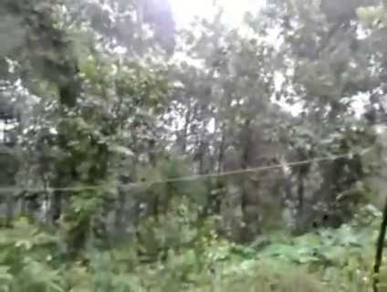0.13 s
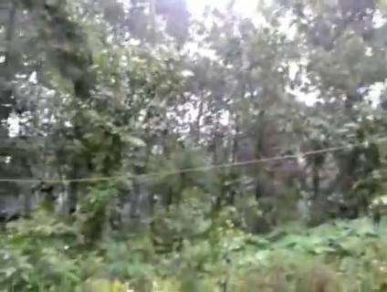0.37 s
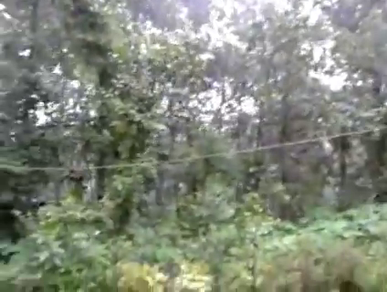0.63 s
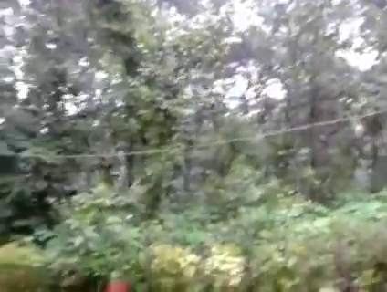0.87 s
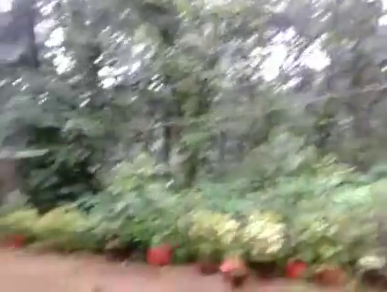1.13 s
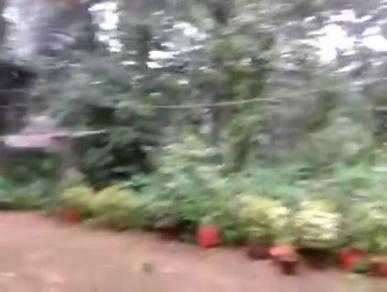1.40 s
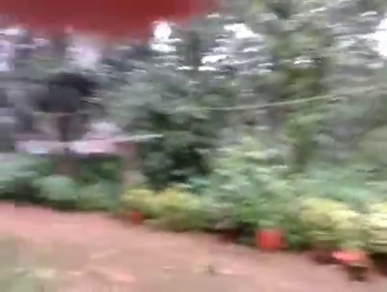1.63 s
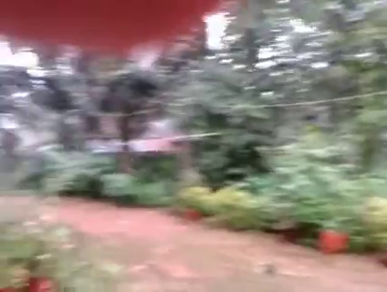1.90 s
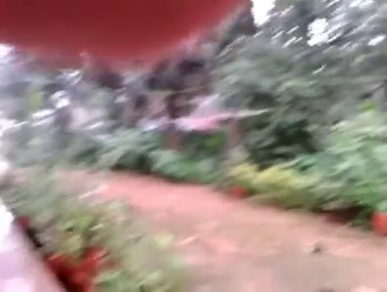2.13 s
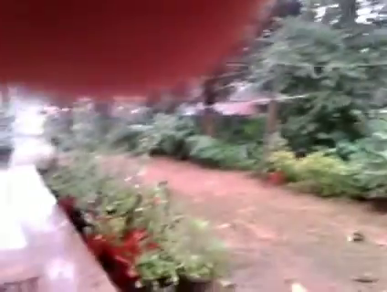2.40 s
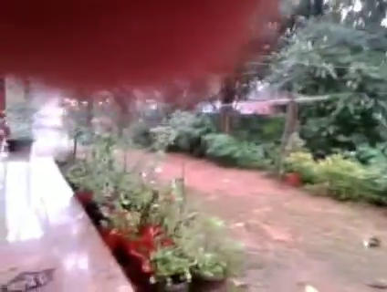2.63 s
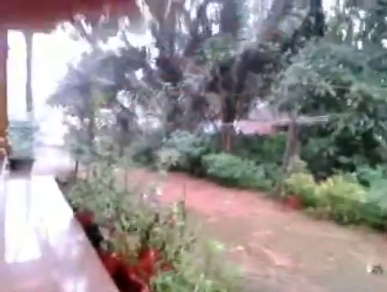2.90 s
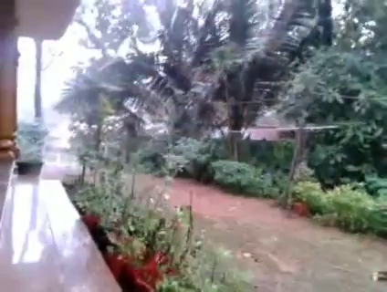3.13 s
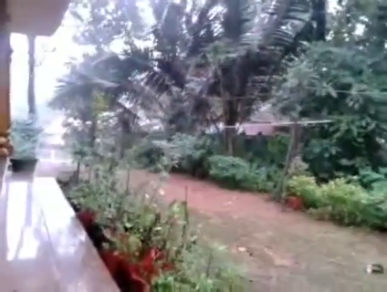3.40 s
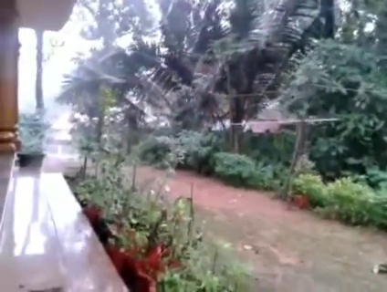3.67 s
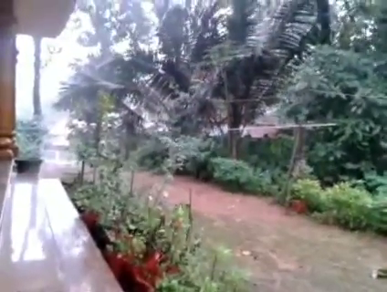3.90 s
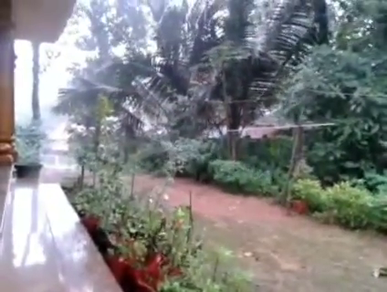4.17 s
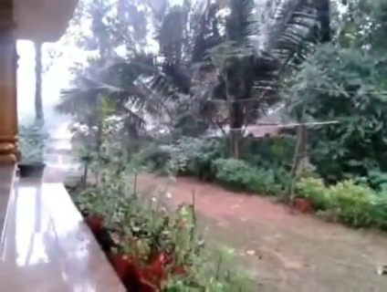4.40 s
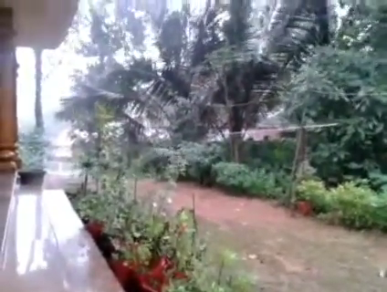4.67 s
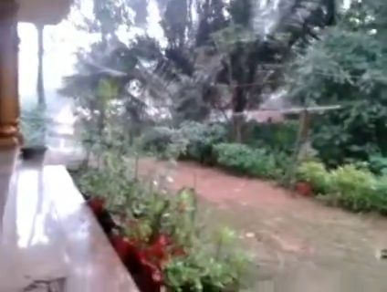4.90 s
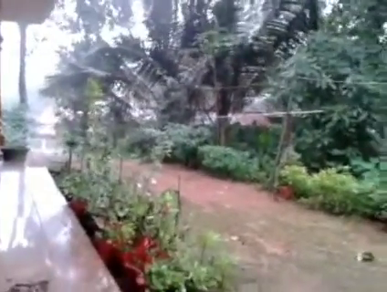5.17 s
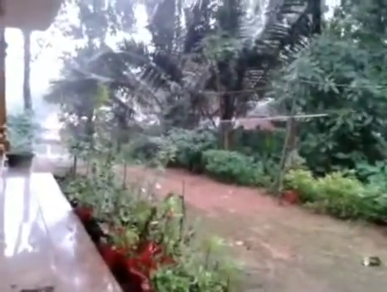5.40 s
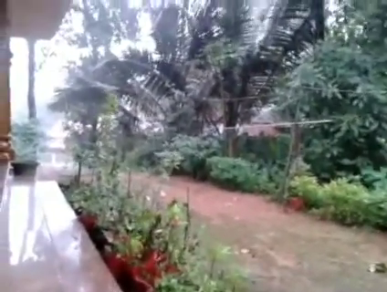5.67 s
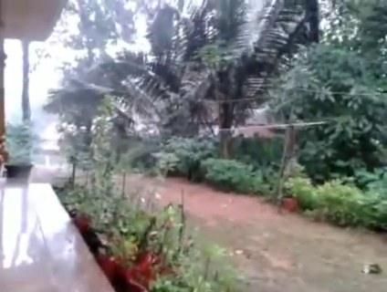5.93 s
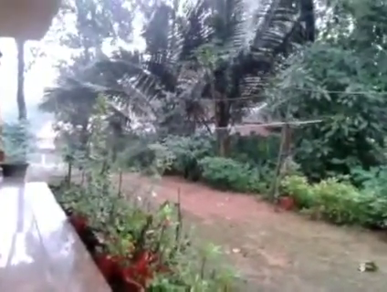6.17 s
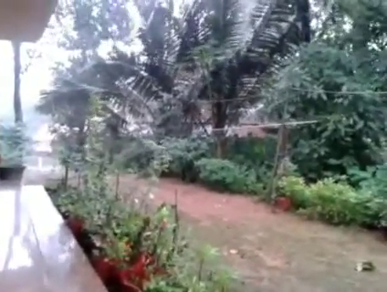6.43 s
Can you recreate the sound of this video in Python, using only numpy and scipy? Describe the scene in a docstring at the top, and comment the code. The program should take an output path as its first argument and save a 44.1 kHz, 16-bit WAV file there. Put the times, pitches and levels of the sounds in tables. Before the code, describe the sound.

Heavy rain is already falling at 0 s and continues without a break to about 6.5 s: a dense, smooth hiss from countless drops on trees, leaves and wet ground, strongest in the middle range, with little deep bass and no very high treble. Very many tiny ticks of nearer drops on leaves give it a fine grain. The level stays nearly constant, slightly brighter around 1.75 s, then sinks gently by a few decibels after 5 s. Beneath it, faint low wind flutters against the microphone in short gusts, notably near 2.4, 3.4, 4.7 and 5.8-6.3 s. Soft dull bumps on the case occur near 0.2 s, clearest at 2.5 s, then clustered around 4.7-4.95 s and 5.8-6.35 s. The listener is on a porch beside an open garden; the small mono microphone sounds close, plain and slightly band-limited. The rain is still falling at the end.

```python
"""A smooth hiss of heavy rain on trees, leaves and wet ground, heard from a porch by a small mono microphone.
Random spectra make the hiss of countless far drops; damped sine ticks make the nearer drops on leaves.
Low noise that swells in gusts makes the wind on the microphone, and short pulses are bumps on its case.
The recorder samples at 16 kHz, so the hiss stops near 7 kHz and leaves a faint mirror above 8 kHz."""
import sys
import numpy as np
from scipy import signal
from scipy.fft import rfft, irfft, next_fast_len
from scipy.io import wavfile
from scipy.ndimage import uniform_filter1d

SR = 44100
rng = np.random.default_rng(int(sys.argv[2]) if len(sys.argv) > 2 else 0)


def invert_db(level):
    """Linear amplitude ratio for a level in decibels (20 dB per decade), elementwise."""
    return 10 ** (np.asarray(level, dtype=float) / 20)


def pcm_store(signal):
    """Save signal as 16-bit PCM."""
    levels = np.round(np.clip(np.atleast_2d(signal), -1, 1) * 32767)
    wavfile.write(sys.argv[1], SR, levels.astype(np.int16).T)


N = 288855  # length in samples

# Slow course of the shower: (t/s, rain level/dB, treble lift/dB)
RAIN_COURSE = [(0, -22.5, -1.5), (1.0, -23, -0.1), (1.3, -21.8, -0.9), (1.75, -22.5, 1), (2.5, -23, -0.5),
               (2.85, -22.5, -1), (3.6, -23.5, 0.1), (4.4, -23.5, -0.8), (5.2, -24, 0), (5.7, -25, -0.2),
               (6.55, -25.5, -0.4)]
# Rain as the microphone colours it: (f/Hz, relative level/dB)
RAIN_SPECTRUM = [(60, -55.5), (105, -42.5), (160, -27.5), (250, -18), (330, -12), (430, -6), (650, -1.5),
                 (1000, -0.26), (1500, -0.76), (2200, -2), (3000, -4.5), (4500, -7.5), (6700, -8)]
# Drops close enough to tick alone: rate, and level relative to the far drops before colouring
NEAR_DROPS_PER_S, NEAR_DROPS_DB = 1400, -13

# Short low thuds as gusts or fingers bump the case: (t of the peak/s, peak level/dB)
CASE_BUMPS = [(0.213, -39), (1.58, -45), (2.502, -34.5), (3.398, -44), (4.721, -40), (4.872, -36),
              (4.945, -40), (5.821, -41), (5.913, -45), (6.129, -44), (6.247, -36), (6.334, -36)]
CASE_HZ = 176

# Breeze on the microphone between gusts: (t/s, level/dB)
BREEZE_COURSE = [(0, -61), (0.9, -57.5), (1.6, -59), (2.3, -63), (2.6, -52), (3.2, -61), (4.5, -62),
                 (4.75, -57), (5.2, -57), (5.65, -62), (6.05, -55), (6.55, -53)]
# Gusts that buffet the microphone: (t of full strength/s, hold/s, level/dB)
WIND_GUSTS = [(0.284, 0.038, -50), (0.618, 0.036, -51), (0.893, 0.074, -53), (1.186, 0.034, -51),
              (1.41, 0.084, -52), (2.404, 0.19, -48.5), (2.75, 0.036, -52), (3.359, 0.05, -47),
              (3.46, 0.039, -50), (4.65, 0.032, -52), (4.708, 0.086, -47), (4.842, 0.081, -47),
              (5.004, 0.036, -53), (5.085, 0.054, -53), (5.227, 0.048, -50), (5.793, 0.13, -45.5),
              (5.983, 0.03, -49), (6.07, 0.17, -46), (6.337, 0.15, -51)]
GUST_RISE_S, GUST_FALL_DB_PER_S = 0.016, 299
# Turbulence at the microphone port: (f/Hz, relative level/dB)
TURBULENCE_SPECTRUM = [(8, -13.5), (20, 0.3), (40, -2), (60, -9.5), (85, -14), (105, -35), (130, -18),
                       (200, -25.5), (300, -35), (600, -73.5)]

# Anti-alias slope before sampling: (f/Hz, gain/dB)
ANTI_ALIAS = [(6850, 0.51), (7100, -6), (7500, -25), (7700, -28), (7850, -32), (8000, -43), (8030, -96.5)]
# What passes of the mirror image when raising the sample rate: (f/Hz, gain/dB)
IMAGE_FILTER = [(7970, -67.5), (8000, 1), (8300, -7.5), (8800, -26.5), (9000, -37.5), (9200, -51.5),
                (9400, -90.5)]
SAMPLING_HZ = 16000
CONVERTER_OFFSET = 0.0016  # of full scale


def rain():
    """Superposition: far and near drops add, then share the colour and slow level of the shower."""
    s, level_db, _ = np.transpose(RAIN_COURSE)
    far = evened(far_drops())
    drops = far + invert_db(NEAR_DROPS_DB) * near_drops()
    upper_end = [(7600, -5.5), (9000, -79.5)]  # (f/Hz, relative level/dB)
    drops = evened(coloured(drops, RAIN_SPECTRUM + upper_end))
    return drops * invert_db(np.interp(np.arange(N) / SR, s, level_db))


def far_drops(patchy_db=0.42, flicker_db=-0.38):
    """Central limit: countless impacts sum to Gaussian noise, here with slight fluctuations of level."""
    frames, hz = N // 128 + 5, np.fft.rfftfreq(512, 1 / SR)
    real, imaginary, patches, flicker = rng.standard_normal((frames, 257, 4)).T
    # patches are narrow in frequency and longer in time; flicker is broad and brief
    patches = uniform_filter1d(patches, size=6, axis=0)
    patches = evened(uniform_filter1d(patches, size=24, axis=1))
    flicker = uniform_filter1d(flicker, size=40, axis=0)
    flicker = evened(uniform_filter1d(flicker, size=3, axis=1))
    # fine drops brighten the hiss: the lift grows from 1200 Hz and is full two octaves above
    s, _, treble_db = np.transpose(RAIN_COURSE)
    lift_db = np.interp(np.arange(frames) * 128 / SR, s, treble_db)
    share = np.clip(np.log2(hz[:, None] / 1200 + 1e-9) / 2, 0, 1)
    level_db = patchy_db * patches + flicker_db * flicker + lift_db * share
    spectra = (real + 1j * imaginary) * invert_db(level_db)
    return signal.istft(spectra, nperseg=512, noverlap=384)[1][:N]


def near_drops(spread_db=3.0, cycles=2.0, pitches=24):
    """Damped free vibration: random impacts ring leaves of random pitch, decaying within a few cycles."""
    # most drops are small, a few are large
    strength = invert_db(spread_db * np.minimum(rng.exponential(1, N), 2.2))
    impacts = strength * (rng.random(N) < NEAR_DROPS_PER_S / SR)
    leaf = rng.integers(0, pitches, N)
    t, out = np.arange(600) / SR, np.zeros(N)
    for k, hz in enumerate(np.geomspace(400, 7000, pitches)):
        tick = np.exp(-t * hz * np.pi / cycles) * np.sin(2 * np.pi * hz * t)
        tick = tick / np.linalg.norm(tick) * np.sqrt(hz)  # energy grows with pitch
        out += signal.oaconvolve(impacts * (leaf == k), tick)[:N]
    return evened(out)


def thuds(cycles=0.43):
    """Impulse response of the case: each bump is a soft push, about two swings under a Gaussian bell."""
    t, out = np.arange(N) / SR, np.zeros(N)
    for s, db in CASE_BUMPS:
        near = slice(round(s * SR) - 1500, round(s * SR) + 1500)
        turns = (t[near] - s) * CASE_HZ
        bell = np.exp(-0.5 * (turns / cycles) ** 2)
        out[near] -= invert_db(db) * bell * np.cos(2 * np.pi * turns)
    return out


def wind(lumpy_db=3.0):
    """Turbulent pressure: low noise whose power sums a lumpy breeze and gusts that rise, hold and fall."""
    s, level_db = np.transpose(BREEZE_COURSE)
    t = np.arange(N) / SR
    lumps = uniform_filter1d(rng.standard_normal(N), size=2000)
    lumps = evened(uniform_filter1d(lumps, size=2000))
    power = invert_db(np.interp(t, s, level_db) + lumpy_db * lumps) ** 2
    for full, hold, db in WIND_GUSTS:
        rise = np.clip((t - full) / GUST_RISE_S + 1, 0, 1)
        fall_db = GUST_FALL_DB_PER_S * np.maximum(t - full - hold, 0)
        power += (rise * invert_db(db - fall_db)) ** 2
    turbulence = evened(coloured(rng.standard_normal(N), TURBULENCE_SPECTRUM))
    return turbulence * np.sqrt(power)


def evened(x):
    """Normalisation: scales x to an rms of 1."""
    return x / np.sqrt(np.mean(x ** 2) + 1e-20)


def coloured(x, points):
    """Linear filtering: multiplies the spectrum of x by a gain curve, straight on a log frequency axis."""
    size = next_fast_len(N)
    hz = np.arange(size // 2 + 1) * SR / size
    f, db = np.transpose(points)
    gain = invert_db(np.interp(np.log(hz + 1), np.log(f + 1), db))
    return irfft(rfft(x, size) * gain, size)[:N]


def scene():
    """Superposition at one microphone, which feeds both channels."""
    return np.tile(rain() + wind() + thuds(), (2, 1))


def top_cut(x):
    """Nothing passes above the cut-off."""
    return signal.sosfilt(signal.butter(12, 9270, fs=SR, output="sos"), x)


def record(dry):
    """Sampling theorem: the band is limited, and a faint image is mirrored about half the sampling rate."""
    limited = coloured(dry[0], ANTI_ALIAS)
    folded = 2 * limited * np.cos(2 * np.pi * SAMPLING_HZ * np.arange(N) / SR)
    mono = limited + coloured(folded, IMAGE_FILTER) + CONVERTER_OFFSET
    return top_cut(np.tile(mono, (2, 1)))


dry = scene()
out = record(dry)
pcm_store(out)
```